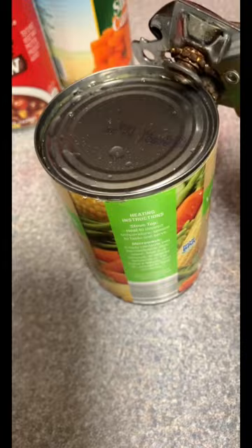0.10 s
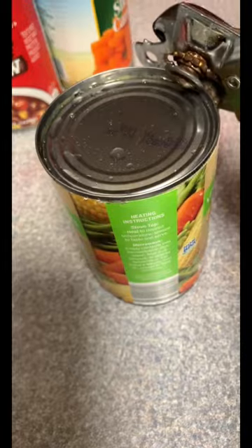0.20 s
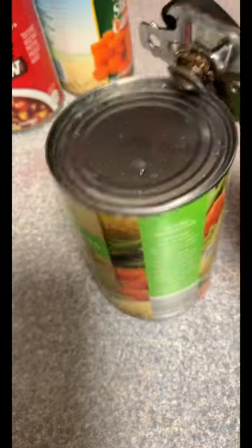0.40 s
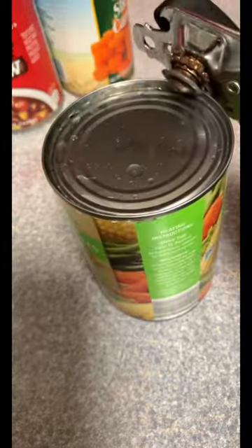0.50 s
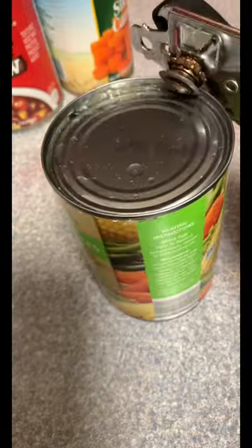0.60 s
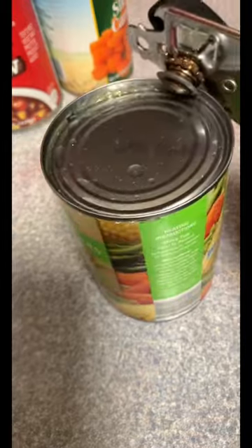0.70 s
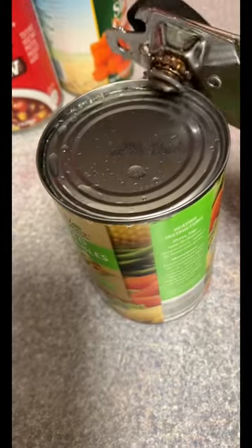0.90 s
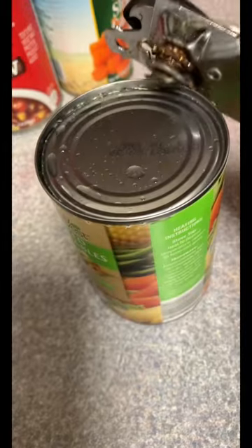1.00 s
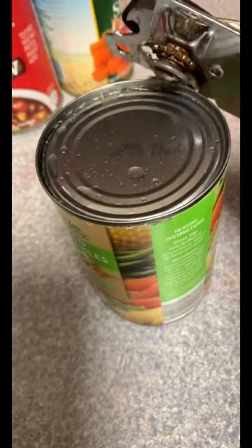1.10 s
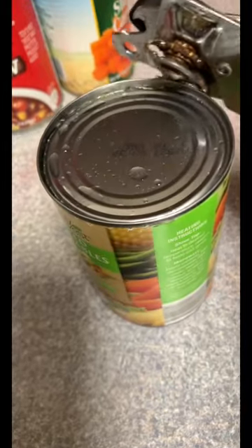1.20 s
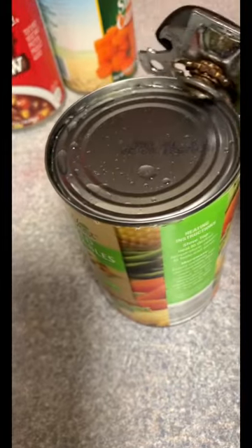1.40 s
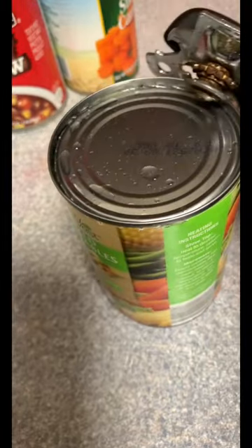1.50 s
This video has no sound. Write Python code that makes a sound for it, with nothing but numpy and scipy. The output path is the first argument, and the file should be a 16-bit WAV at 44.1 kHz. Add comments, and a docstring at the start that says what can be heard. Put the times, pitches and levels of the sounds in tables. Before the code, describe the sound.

A hand-squeezed can opener clicks and scrapes on a steel can, then cracks loudly through the lid with a rattle and ringing; smaller clicks follow, one strong near the end. Close microphone, humming kitchen.

```python
"""Close to the microphone in a kitchen, a hand-squeezed can opener works round a steel can lid.
From the start an appliance hums (two wavering tones) over room rumble and hiss (coloured noise), and the
cutter scrapes (rough noise). Clicks begin at once (noise bursts and damped modes), and soft hand bumps come
at 0.23 and 0.53 s. At 0.45 s the lid gives way: a loud snap and rattle, with ringing steel and room
reverberation held down just after the crack, as by the microphone's limiter, then recovering and dying away.
More clicks follow, the strongest near 1.2 s."""
import sys
import numpy as np
from scipy import signal
from scipy.fft import rfft, irfft, next_fast_len
from scipy.io import wavfile
from scipy.ndimage import map_coordinates

SR = 44100
rng = np.random.default_rng(int(sys.argv[2]) if len(sys.argv) > 2 else 0)


def put_to_file(sound):
    """Save the sound as 16-bit audio at rate SR, in the file named by the first command-line argument."""
    columns = np.atleast_2d(sound).T  # one column per channel
    safe = np.clip(columns, -1, 1)
    whole_steps = np.round(safe * 32767)
    wavfile.write(sys.argv[1], SR, whole_steps.astype(np.int16))


N = 66150  # samples, 1.5 s

# Steady tones of the appliance. Each row: frequency in Hz, middle rms level in dB.
HUM_TONES = [(144, -36.5), (4538, -64)]
HUM_WAVER_DB, HUM_DRIFT_RAD, HUM_CHANGES_PER_S = .6, .15, 10
# Spectrum of the kitchen's rumble and hiss. Each row: frequency in Hz, relative density in dB per Hz.
BACKGROUND_COLOUR = [(20, -29), (35, -10.5), (52, 5), (70, 0.5), (105, -3.5), (150, 1.5), (205, 1.5),
                     (300, -4.5), (400, -11.5), (520, -21.5), (700, -15.5), (1050, -16.5), (1500, -47.5),
                     (2400, -31), (3600, -33), (4600, -39.5), (6300, -29.5), (7600, -34.5), (10000, -61)]
BACKGROUND_DB = -37  # rms

# Level of the cutter dragging through the seam. Each row: time in seconds, rms level in dB.
SCRAPE_LEVEL = [(0, -48), (.12, -51.5), (.2, -36.5), (.26, -41), (.32, -50), (.39, -41), (.44, -48.5),
                (.75, -51.5), (1.08, -49.5), (1.14, -46), (1.2, -42.5), (1.3, -54.5), (1.5, -45)]
# Spectrum of that scrape. Each row: frequency in Hz, relative density in dB per Hz.
SCRAPE_COLOUR = [(200, -8), (400, -2), (700, -5), (1000, -4), (1350, 0), (1750, 1), (2300, -10),
                 (3000, -15), (3900, -12), (5000, -16), (6500, -13), (10000, -33)]
SCRAPE_ROUGH_DB, SCRAPE_CHANGES_PER_S = 1, 560

# Bites of the cutter. Each row: start in seconds, then levels in dB of tick, clack, can knock,
# lid ring and opener ring, each applied to the sounds shaped below.
BITES = [(0.0427, -39.5, -27, -19.5, -52, -57), (0.108, -52, -42, -27, -56, -56),
         (0.21, -19.5, -18, -47, -54, -27), (0.2169, -28.5, -30.5, -27, -69.5, -40),
         (0.352, -50, -42, -24.5, -47.5, -69.5), (0.721, -53, -39, -29.5, -60, -55),
         (0.9345, -27.5, -70, -24, -39.5, -46), (1.188, -48, -47, -36, -54, -59),
         (1.2181, -17, -14, -9, -23.5, -20.5)]
# Spectrum of the cutter's tick. Each row: frequency in Hz, relative density in dB per Hz.
TICK_COLOUR = [(300, -16.5), (1200, -4.5), (2100, -6), (2700, -8), (3600, 4), (5000, -3.5), (6200, -4),
               (8000, -9.5), (10000, -25)]
# Spectrum of the lid's clack. Each row: frequency in Hz, relative density in dB per Hz.
CLACK_COLOUR = [(200, -2), (520, -0.5), (660, -9.5), (900, -5), (1150, 1.5), (1600, -10), (2050, -11),
                (2700, -19.5), (8000, -48)]
# Modes of the can knocking on the counter. Each row: frequency in Hz, relative level in dB, t60 in seconds.
CAN_MODES = [(94, -16.5, 0.35), (229.6, -2, 0.078), (317.8, -6.5, 0.23), (354.4, 4.5, 0.06),
             (380.8, -11, 0.18), (515.3, -14.5, 0.15)]
# Modes of the lid under the cutter. Each row: frequency in Hz, relative level in dB, t60 in seconds.
LID_MODES = [(1162, 0, .31), (1626, 0, .18), (1775, -12, .28), (2200, -9, .2), (2649, -15, .24),
             (3062, -10, .22), (3456, -11, .13), (4455, -8, .14), (4759, -12, .17), (6207, -15, .16)]
# Modes of the opener's short ring. Each row: frequency in Hz, relative level in dB, t60 in seconds.
OPENER_MODES = [(1120, 2, .07), (1930, -3, .07), (2090, 0, .06), (3370, -3, .05), (3740, -8, .05),
                (5990, -5, .06), (6220, -5, .06)]
# Rises are time constants in seconds; t60 is the seconds taken to fall 60 dB.
TICK_RISE_S, TICK_T60 = .0003, .035
CLACK_RISE_S, CLACK_T60 = 0.0011, 0.071
CLACK_TAIL_DB, CLACK_TAIL_T60 = -14, 0.38  # level relative to the clack
KNOCK_LAG_S, KNOCK_RISE_S = .002, 0.0031
CLICK_ROOM_DB, CLICK_ROOM_RISE_S = -15, .019  # gain and onset of the room on the clicks
RING_SCATTER_DB = 1  # standard deviation for each mode at each blow

# Soft bumps of the hands on the can. Each row: start in seconds, level in dB before scatter.
HAND_BUMPS = [(0.234, -22.5), (0.532, -30.5)]
BUMP_HZ, BUMP_T60, BUMP_RISE_S = 67, .28, .006

# The big snap and the rattle after it. Each row: start in seconds, level in dB, t60 in seconds.
SNAP_BLOWS = [(0.449, -3, .024), (0.454, -17, .012), (0.4708, -19, .025), (0.4797, -11, .018),
              (0.4967, -18, .01)]
# Spectrum of each of those blows. Each row: frequency in Hz, relative density in dB per Hz.
CRACK_COLOUR = [(40, -32), (100, -15), (220, -3), (450, -7), (620, -16), (900, -3), (1200, -1), (1500, -3),
                (2200, 2), (3200, -3), (4200, 1), (5000, -9), (5800, -4), (8000, -10), (10000, -24)]
SNAP_RISE_S = 0.0003
# Steel set ringing by the snap. Each row: frequency in Hz, relative level in dB, t60 in seconds.
STEEL_MODES = [(97, -18, .32), (255, -14, .2), (527, -21, .34), (936, -17, .26), (1095, -11, .31),
               (1220, -20, .25), (1335, -20, .32), (1474, -19, .31), (1700, -23, .32), (1796, -20, .3),
               (1919, -16, .28), (2840, -27, .27), (5654, -20, .34), (5746, -18, .29), (5825, -20, .28),
               (6605, -22, .29), (6987, -22, .3)]
STEEL_DB, STEEL_RISE_S = 1, .013
# Spectrum of the kitchen's answer to the snap. Each row: frequency in Hz, relative density in dB per Hz.
REVERB_COLOUR = [(50, -7.5), (100, -6), (160, 5), (260, 4.5), (420, 1), (700, -7.5), (950, 5), (1400, 2),
                 (1950, 3.5), (2400, -5.5), (3000, -2.5), (3750, -8.5), (4600, -4), (5200, -4), (5800, 4.5),
                 (7000, -1), (8400, -14), (10000, -35.5)]
REVERB_DB = -6.5
RECOVERY_S, RECOVERY_STEEP = .019, 3  # return of level after the crack; steepness is an exponent

# How long the kitchen rings. Each row: frequency in Hz, t60 in seconds.
ROOM_DECAY = [(100, 0.27), (300, 0.51), (1000, 0.37), (2000, 0.37), (4000, 0.42), (6500, 0.4),
              (10000, 0.43)]
LATE_DB, LATE_T60 = -26.5, 0.5  # weak late tail, relative to the room's start

CLIP_TOP, CLIP_HARDNESS = 1.0, 5  # recorder's ceiling (full scale 1) and sharpness of its knee
TOP_HZ = 10000  # recorder's band limit


def amp(db):
    """Decibels to gain."""
    return 10 ** (np.asarray(db) / 20)


def unit(x):
    """Scale to rms 1."""
    return x / np.sqrt(np.mean(x ** 2) + 1e-20)


def along(points, hz):
    """Read (Hz, value) points on a log frequency axis."""
    f, v = np.transpose(points)
    return np.interp(np.log(hz + 1), np.log(f + 1), v)


def since(s):
    """Seconds since time s, zero before it."""
    return np.maximum(np.arange(N) / SR - s, 0)


def wobble(rate):
    """A smooth random curve through `rate` random knots a second."""
    knots = rng.standard_normal(2048)
    return map_coordinates(knots, [since(0) * rate], mode="mirror")


def filtered(x, response):
    """x shaped by a response of frequency, zero-padded so that nothing wraps round early."""
    m = next_fast_len(N + SR // 2)
    gain = response(np.fft.rfftfreq(m, 1 / SR))
    return irfft(rfft(x, m) * gain, m)[:N]


def noise(colour):
    """Noise of rms 1 with the given spectrum."""
    return unit(filtered(rng.standard_normal(N), lambda hz: amp(along(colour, hz))))


def fade(t, t60):
    """Exponential decay, 60 dB in t60."""
    return np.exp(-np.log(1000) * t / t60)


def struck(s, rise, t60):
    """Envelope of a blow at time s: a quick rise, then exponential decay."""
    return (1 - np.exp(-since(s) / rise)) * fade(since(s), t60)


def ring(modes, s, rise):
    """Damped sine modes struck at time s, their levels a little different each time."""
    out = np.zeros(N)
    for hz, db, t60 in modes:
        level = amp(db + RING_SCATTER_DB * rng.standard_normal())
        out += level * struck(s, rise, t60) * np.sin(2 * np.pi * hz * since(s))
    return out


def die_in_room(x, s):
    """From time s each frequency of x dies at the room's speed, leaving a weak late tail."""
    hz, t, spectrum = signal.stft(x, SR, nperseg=256)
    age = np.maximum(t - s, 0)
    main = fade(age, along(ROOM_DECAY, hz)[:, None])
    late = amp(LATE_DB) * fade(age, LATE_T60)
    return signal.istft(spectrum * np.hypot(main, late), SR, nperseg=256)[1][:N]


def appliance():
    """A low hum and faint whine, each a sine whose level and phase waver slightly."""
    out = np.zeros(N)
    for hz, db in HUM_TONES:
        drift = HUM_DRIFT_RAD * wobble(HUM_CHANGES_PER_S)
        tone = unit(np.sin(2 * np.pi * hz * since(0) + drift))
        out += amp(db + HUM_WAVER_DB * wobble(HUM_CHANGES_PER_S)) * tone
    return out


def kitchen_background():
    """The room's rumble and hiss: steady noise, strongest in the lows."""
    return amp(BACKGROUND_DB) * noise(BACKGROUND_COLOUR)


def scrape():
    """The cutter drags through the seam: coloured noise made gritty by rapid random level changes."""
    level_db = np.interp(since(0), *np.transpose(SCRAPE_LEVEL))
    grit = amp(SCRAPE_ROUGH_DB * wobble(SCRAPE_CHANGES_PER_S))
    return amp(level_db) * unit(noise(SCRAPE_COLOUR) * grit)


def click_room(x):
    """The kitchen's reverberation on the clicks: convolution with soft-starting, dying noise of unit energy."""
    onset = 1 - np.exp(-since(0) / CLICK_ROOM_RISE_S)
    echo = die_in_room(rng.standard_normal(N), 0) * onset
    return amp(CLICK_ROOM_DB) * signal.fftconvolve(x, echo / np.linalg.norm(echo))[:N]


def clicks():
    """Each bite of the cutter: a tick that rings the opener, the lid's clack and ring, a knock of the can."""
    out = np.zeros(N)
    for s, tick_db, clack_db, knock_db, lid_db, opener_db in BITES:
        clack_tail = amp(CLACK_TAIL_DB) * struck(s, CLACK_RISE_S, CLACK_TAIL_T60)
        clack = struck(s, CLACK_RISE_S, CLACK_T60) + clack_tail
        out += amp(tick_db) * noise(TICK_COLOUR) * struck(s, TICK_RISE_S, TICK_T60)
        out += amp(clack_db) * noise(CLACK_COLOUR) * clack
        out += amp(knock_db) * ring(CAN_MODES, s + KNOCK_LAG_S, KNOCK_RISE_S)
        out += amp(lid_db) * ring(LID_MODES, s, CLACK_RISE_S)
        out += amp(opener_db) * ring(OPENER_MODES, s, TICK_RISE_S)
    return out + click_room(out)


def hand_bumps():
    """Hands bump the can softly: one low damped mode for each bump."""
    return sum(ring([(BUMP_HZ, db, BUMP_T60)], s, BUMP_RISE_S) for s, db in HAND_BUMPS)


def snap():
    """The lid gives way: a crack and rattle, with ringing steel and room reverberation held down just
    after the crack, as by the microphone's limiter, then recovering and dying away."""
    start = SNAP_BLOWS[0][0]
    cracks = np.zeros(N)
    for s, db, t60 in SNAP_BLOWS:
        cracks += amp(db) * noise(CRACK_COLOUR) * struck(s, SNAP_RISE_S, t60)
    # a fixed gain curve stands in for the limiter, on steel and reverberation only
    recovery = 1 - np.exp(-(since(start) / RECOVERY_S) ** RECOVERY_STEEP)
    reverb = amp(REVERB_DB) * die_in_room(noise(REVERB_COLOUR), start)
    steel = amp(STEEL_DB) * ring(STEEL_MODES, start, STEEL_RISE_S)
    return cracks + recovery * (reverb + steel)


def scene():
    """Opener, can and kitchen at one microphone."""
    background = appliance() + kitchen_background()
    return (background + scrape() + clicks() + hand_bumps() + snap())[None]


def record(dry):
    """The recorder rounds off the highest peaks and cuts steeply above its band limit."""
    x = dry[0]
    rounded = x / (1 + np.abs(x / CLIP_TOP) ** CLIP_HARDNESS) ** (1 / CLIP_HARDNESS)
    return filtered(rounded, lambda hz: 1 / np.sqrt(1 + (hz / TOP_HZ) ** 260))[None]


dry = scene()
out = record(dry)
put_to_file(out)
```